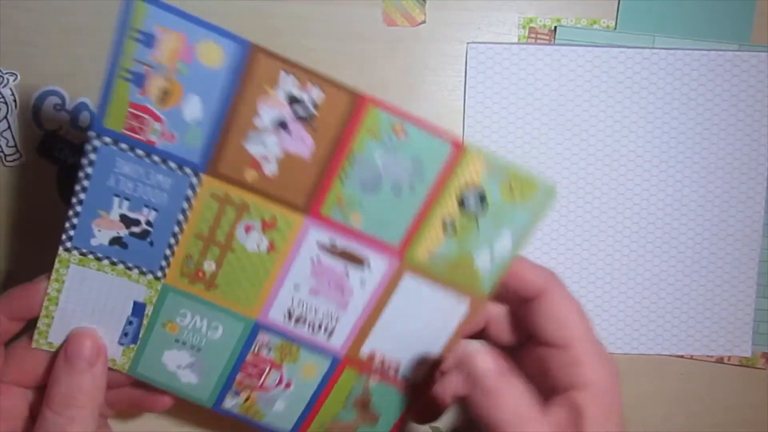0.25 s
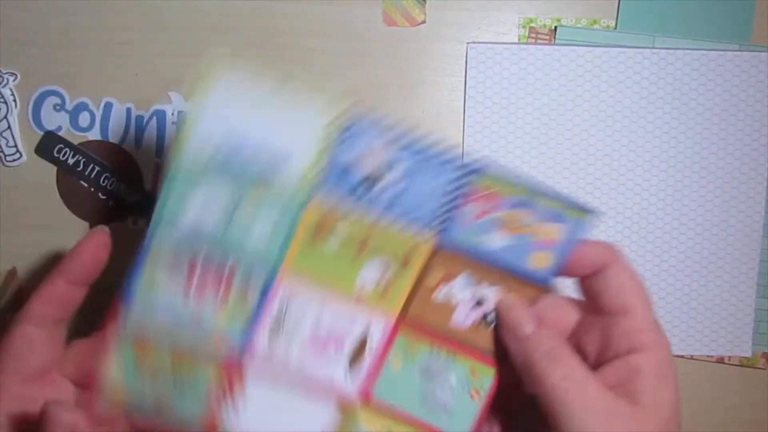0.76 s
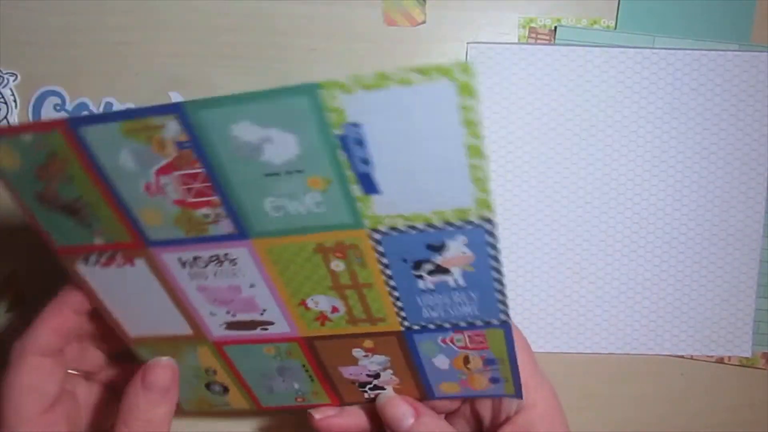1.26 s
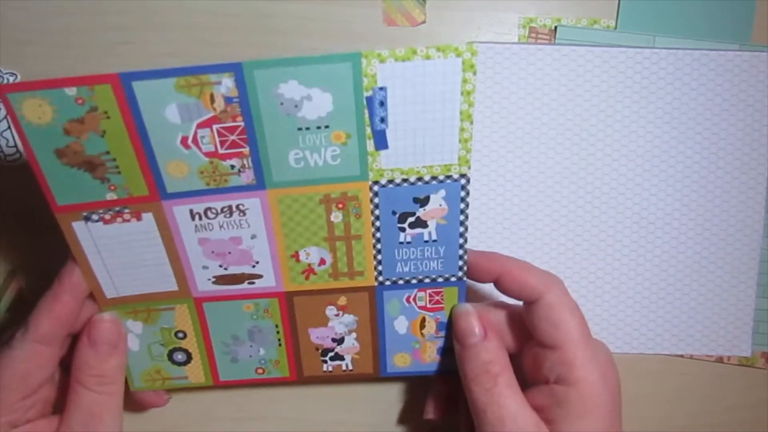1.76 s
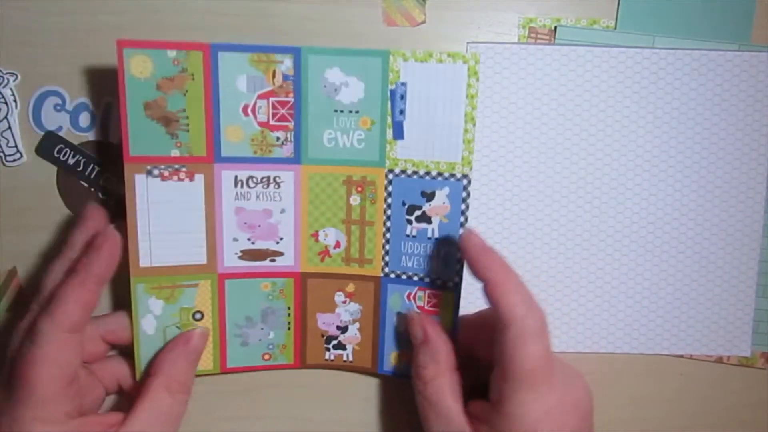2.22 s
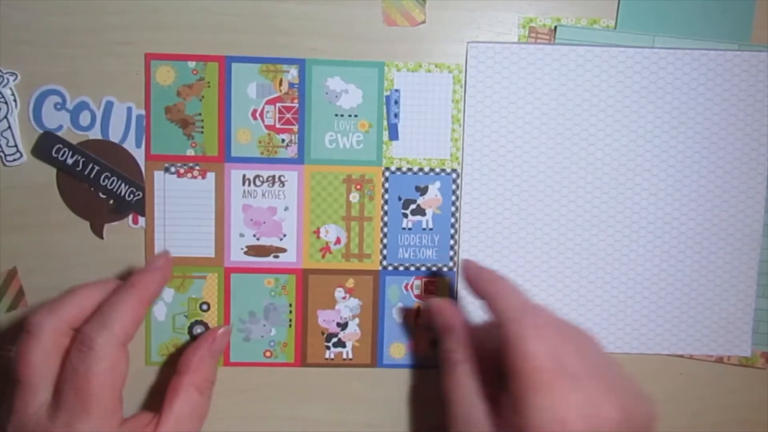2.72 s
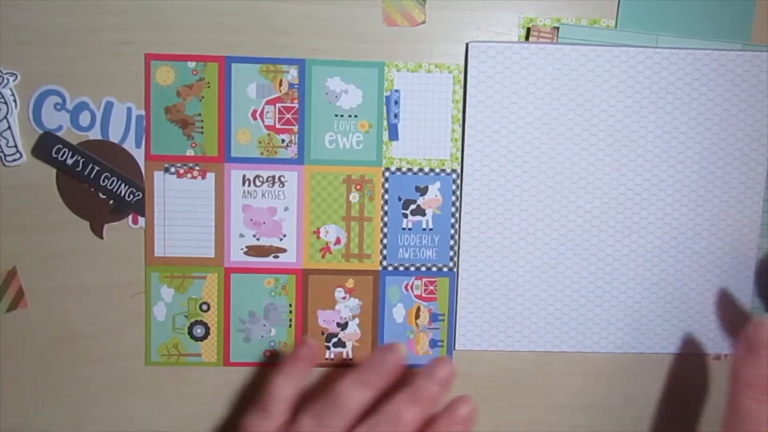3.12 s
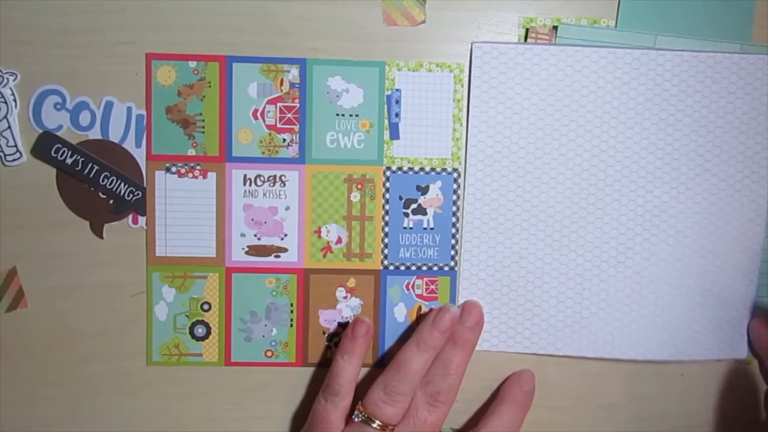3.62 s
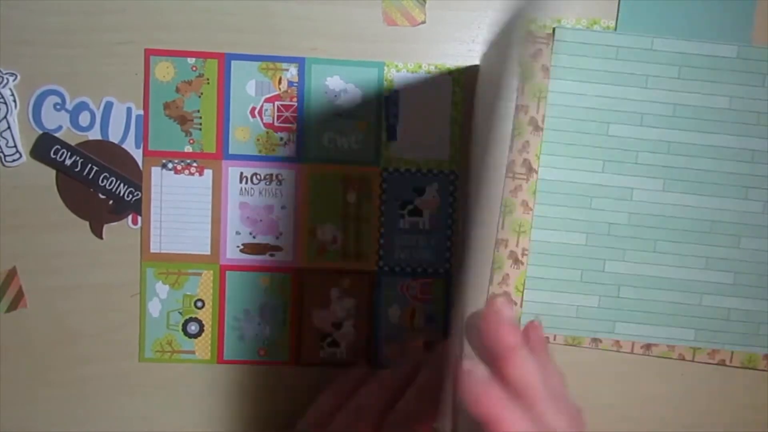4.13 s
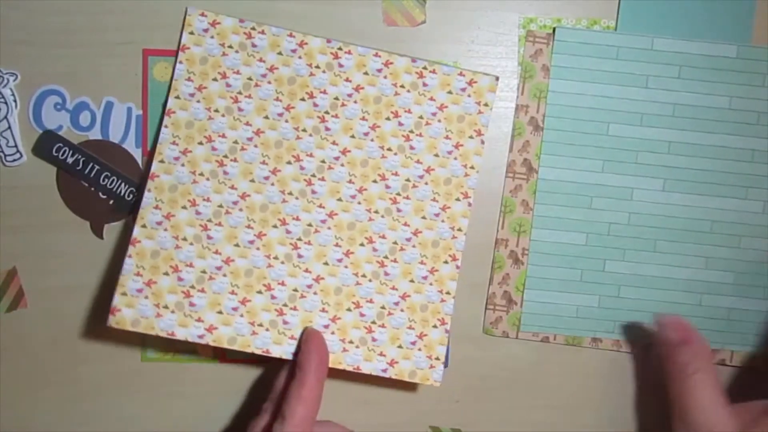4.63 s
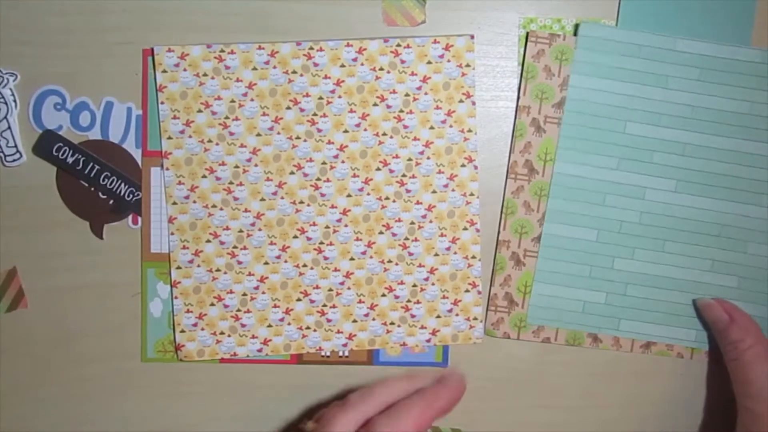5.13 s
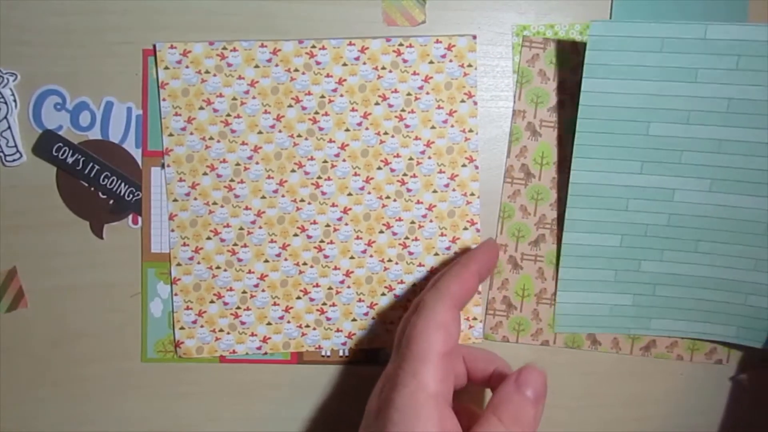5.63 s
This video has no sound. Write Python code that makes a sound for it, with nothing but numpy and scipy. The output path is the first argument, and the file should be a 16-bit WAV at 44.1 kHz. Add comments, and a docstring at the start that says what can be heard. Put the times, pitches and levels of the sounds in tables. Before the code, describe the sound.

Stiff paper is handled on a desk in a quiet room, heard in stereo from just above, with faint ventilation rumble and electrical hum throughout. Fingers rub softly at first. From about 0.7 to 1.4 seconds a sheet is turned, giving hollow buckling pops, crisp clicks and a low flutter of air. Light sliding follows. From 2.2 seconds a swish rises in pitch as the sheet sinks onto the desk, ending in a scuff and sharp snap at 2.6. Fingers brush over the paper. Between 3.7 and 4.2 seconds a second sheet is lifted and flipped with a cluster of snaps and hollow pops, loudest at about 3.8, along with a soft waft of air. It settles with quiet rubbing, and from 5 seconds to about 5.8 there are small scuffs, ticks and gentle flexing sounds as it is nudged into place.

```python
"""A desk in a quiet room, heard through the two microphone ports of a camera above it. Stiff paper sheets
are turned, laid down and lifted. Fibres catch under sliding fingers and edges, the waved sheet pushes air,
folds buckle with hollow pops, edges scuff and corners snap. Once, the rubbing rises in pitch as the air
gap closes under a sinking sheet. Air handling rumbles and the mains hum behind it all."""
import sys
import numpy as np
from scipy import signal
from scipy.fft import rfft, irfft, next_fast_len
from scipy.io import wavfile
from scipy.ndimage import uniform_filter1d, map_coordinates

SR = 44100
rng = np.random.default_rng(int(sys.argv[2]) if len(sys.argv) > 2 else 0)


def file_out(sig):
    """Save sig as 16-bit WAV at sys.argv[1]."""
    # one column per channel
    cols = np.atleast_2d(sig).T
    # limit, then scale
    lim = np.clip(cols, -1, 1)
    pcm = np.round(lim * 32767).astype(np.int16)
    wavfile.write(sys.argv[1], SR, pcm)


N = 258859

# resonance of the air gap under the sinking sheet: time_s, pitch_hz, level_db
AIR_GAP = [(2.16, 1500, -59), (2.24, 1930, -46.5), (2.42, 2380, -48), (2.52, 3360, -48.5),
           (2.59, 5470, -44), (2.63, 6000, -83)]


def amp(db):
    """Gain of a level in dB."""
    return 10 ** (np.asarray(db) / 20)


def unit(x):
    """x at rms 1."""
    return x / np.sqrt(np.mean(x ** 2) + 1e-20)


def along(points, hz):
    """Values at hz, interpolated between points on a log frequency axis."""
    point_hz, values = np.transpose(points)
    return np.interp(np.log(hz + 1), np.log(point_hz + 1), values)


def curves(rows):
    """One value per sample for each column after the time."""
    time_s, *columns = np.transpose(rows)
    return [np.interp(np.arange(N) / SR, time_s, column) for column in columns]


def wobble(rate):
    """A smooth random curve, rate knots a second."""
    return map_coordinates(rng.standard_normal(int(N * rate / SR) + 4), [np.arange(N) * rate / SR])


def filtered(x, response):
    """x through a complex frequency response."""
    size = next_fast_len(x.shape[-1] + 4096)
    return irfft(rfft(x, size) * response(np.fft.rfftfreq(size, 1 / SR)), size)[..., :x.shape[-1]]


def noise(spectrum, grit_db=0, patchy_db=0):
    """Coloured noise of rms 1; grit makes single fibres stand out, patches shift its tone."""
    bins = signal.stft(rng.standard_normal(N) * amp(grit_db * wobble(700)), nperseg=256)[2]
    patches = uniform_filter1d(uniform_filter1d(rng.standard_normal(bins.shape), 3, axis=0), 22, axis=1)
    patchy = signal.istft(bins * amp(patchy_db * unit(patches)), nperseg=256)[1][:N]
    return unit(filtered(patchy, lambda hz: amp(along(spectrum, hz))))


def mode(hz, centre_hz, q):
    """A causal resonance of peak gain 1."""
    damping = 1j * hz * centre_hz / q
    return damping / (centre_hz ** 2 - hz ** 2 + damping)


def room_tone():
    """Air handling rumble and a wavering mains hum, stronger on the left."""
    # rumble spectra, mid and side: frequency_hz, gain_db
    mid_spectrum = [(20, -26), (55, 3), (90, -4), (160, -7), (300, -10), (600, -25.5), (1400, -20.5),
                    (3400, -40), (6500, -31.5), (14000, -42.5)]
    side_spectrum = [(20, -37), (55, -2.5), (120, -2.5), (300, -5), (600, -17), (1400, -21), (2500, -51.5),
                     (5000, -69), (10000, -32), (15000, -45)]
    mid, side = amp(-52.5) * noise(mid_spectrum), amp(-48.5) * noise(side_spectrum)
    phase = 2 * np.pi * 120 * np.arange(N) / SR + .5 * wobble(4.9)
    hum = amp(-49.5 + 3.5 * wobble(10)) * np.sin(phase)
    return np.array([mid + side, mid - side]) * amp([[.7], [-.7]]) + hum * amp([[2.5], [-2.5]])


def pressure():
    """Gains of sheet body, hiss and fibres: each stroke rises, holds and dies as the pressure goes."""
    # strokes: full_pressure_s, rise_s (per 20 dB), hold_s, hiss_db, body_over_hiss_db, fibre_over_hiss_db
    strokes = [(0, .05, 0.079, -58, -11, 0), (0.311, 0.16, 0.06, -53.5, -17, 1.5),
               (0.402, 0.14, 0.25, -60.5, -0.5, 2.5), (0.67, 0.3, 0.091, -57.5, -1, -3),
               (0.866, 0.3, 0.054, -50.5, 3, -2.5), (1.031, 0.03, 0.13, -54, 3, -0.5),
               (1.356, 0.05, 0.19, -50.5, -2.5, -1), (1.663, 0.52, 0.042, -57.5, 1, -7.5),
               (1.794, 0.16, 0.046, -60, 0.5, -7), (1.947, 0.1, 0.037, -58, -0.5, -4),
               (2.158, 0.2, 0.03, -51.5, -3.5, 1.5), (2.216, 0.2, 0.17, -53.5, -5, -3.5),
               (2.578, 0.38, 0.015, -45.5, -21, -7), (2.874, 0.15, 0.35, -56.5, 7, -0.5),
               (3.295, .15, .11, -52, 2, -3.5), (3.461, 1.1, 0.12, -58.5, -6.5, 1),
               (3.692, -0.15, 0.078, -60.5, 12.5, -3), (3.897, 0.04, .17, -54.5, 3, -2),
               (4.118, 1, 0.06, -59, 0.5, 2.5), (4.224, 0.04, 0.17, -55, 1, -0.5),
               (4.574, 0.5, 0.08, -62, 3.5, -1.5), (4.766, 0.2, 0.2, -57.5, 2.5, 0.5),
               (5.017, 0.06, 0.19, -60, 2, 2.5), (5.181, -0.08, 0.24, -53.5, 1.5, -0.5),
               (5.51, 0.3, 0.044, -53.5, -18, 0), (5.601, 0.15, 0.065, -50.5, 2.5, -1.5),
               (5.746, 0.13, 0.092, -51, -2, 0)]
    # floor between strokes: body_db, hiss_db, fibre_db
    rest_db = (-71, -86, -83)
    lift_db_per_s = 417
    t = np.arange(0, N / SR, .001)
    power = amp(rest_db)[:, None] ** 2
    for full_s, rise_s, hold_s, hiss_db, body_db, fibre_db in strokes:
        rise_db = 20 * np.maximum(full_s - t, 0) / max(rise_s, .005)
        lift_db = lift_db_per_s * np.maximum(t - full_s - hold_s, 0)
        power = power + amp(hiss_db - rise_db - lift_db + np.c_[[body_db, 0, fibre_db]]) ** 2
    return [np.interp(np.arange(N) / SR, t, np.sqrt(layer)) for layer in power]


def slide():
    """Fibres catch under fingers and edges; the desk under a hovering sheet returns a close echo."""
    # spectra of sheet body, surface hiss and finest fibres: frequency_hz, gain_db
    body_spectrum = [(300, -4), (550, -8.5), (1200, -1), (2100, -3), (2800, -5.5), (3600, -11),
                     (8000, -24.5)]
    hiss_spectrum = [(1200, -39), (2500, -19), (4000, -2.5), (6000, 3), (8000, -0.5), (11000, -31)]
    fibre_spectrum = [(4000, 2), (7000, -11), (9000, 3.5), (13000, 0.5), (15500, -8)]
    creases_per_s, echo_s = 60, .00125
    body, hiss, fibre = pressure()
    catch = amp(1.8 * wobble(50))
    rub = body * noise(body_spectrum, grit_db=0.5, patchy_db=2.04)
    rub += hiss * catch * noise(hiss_spectrum, grit_db=2.2, patchy_db=3)
    creases = (rng.random(N) < creases_per_s / SR) * rng.standard_normal(N) * hiss * amp(18)
    rub += filtered(creases, lambda hz: mode(hz, 6000, q=1.2))
    rub += closing_gap()
    _, gap_db = curves(AIR_GAP)
    echo_gain = .3 * np.clip((gap_db + 75) / 15, 0, 1)
    rub -= echo_gain * np.roll(rub, round(echo_s * SR))
    return rub + fibre * catch * noise(fibre_spectrum, grit_db=1.5, patchy_db=2.4)


def waved_air():
    """The waving sheet moves air in a low, uneven flutter."""
    # strength of the moving air: time_s, level_db
    swell = [(0.0, -58), (.55, -49.5), (1.0, -49.5), (1.55, -51.5), (1.8, -60.5), (3.68, -57.5),
             (3.85, -47.5), (4.54, -63.5), (4.95, -50), (5.5, -66)]
    # its spectrum: frequency_hz, gain_db
    spectrum = [(70, -10.5), (140, 5), (215, -7.5), (320, -10.5), (550, -11.5), (1000, -42.5)]
    return amp(curves(swell)[0] + 2.2 * wobble(24)) * noise(spectrum)


def thump(t, centre_hz=360, t60_s=0.09):
    """The whole sheet flexes once, low and short."""
    push = rng.standard_normal(len(t)) * amp(-60 * t / t60_s)
    flex = filtered(push, lambda hz: mode(hz, centre_hz, q=0.8) ** 2)
    return flex / np.abs(flex).max()


def buckles():
    """A fold runs through the sheet in uneven jerks, each ringing the curved panel."""
    # the sheet gives way: start_s, level_db, pitch_hz, t60_s, thump_over_level_db
    folds = [(0.211, -43.5, 1210, 0.088, -12), (.421, -35, 1350, 0.053, -20.5),
             (0.713, -19.5, 995, 0.06, -8.5), (0.723, -21, 835, 0.047, -10), (0.734, -21, 930, 0.059, -13),
             (0.9305, -20, 990, 0.044, -10.5), (.948, -31.5, 870, 0.12, 1), (1.013, -29, 1060, 0.088, -6),
             (1.357, -27.5, 935, 0.06, -9.5), (2.6, -32.5, 1170, 0.054, -2), (3.799, -7, 1310, 0.056, -16),
             (3.81, -15, 1320, 0.049, -29), (3.819, -11.5, 1360, 0.079, -13), (3.895, -30, 850, 0.12, -8),
             (4.176, -36.5, 990, 0.069, 6.5), (4.188, -22, 1260, 0.045, 0), (4.803, -59, 1130, .1, 25),
             (5.195, -43.5, 2140, 0.18, -3), (5.375, -38.5, 2000, 0.048, -22),
             (5.518, -39.5, 1530, 0.065, -11), (5.6, -32.5, 1950, 0.072, -10),
             (5.742, -38.5, 1510, 0.31, -17), (5.798, -39, 1440, 0.089, -14)]
    out, t = np.zeros(N + SR), np.arange(SR // 4) / SR
    for start_s, level_db, pitch_hz, t60_s, thump_db in folds:
        q = 1.7 * amp(-.18 * level_db)  # gentler folds ring more sharply

        def panel(hz):
            modes = mode(hz, pitch_hz, q) ** 2 + 0.36 * mode(hz, 1.33 * pitch_hz, q=1.4) ** 2
            return modes / (1 + 1j * hz / (2 * pitch_hz)) ** 3  # rolls off from an octave up

        jerks = rng.standard_normal(len(t))
        jerks *= amp(2.15 * np.repeat(rng.standard_normal(len(t)), 60)[:len(t)])
        jerks *= amp(-60 * t / t60_s) * (1 - np.exp(-t / .002))
        jerks[20] += 2.5  # the first give is the strongest
        ring = filtered(jerks, panel)
        ring /= 3.0 * np.sqrt(np.mean(ring[:round(t60_s * SR / 4) + 40] ** 2))
        out[round(start_s * SR):][:len(t)] += amp(level_db) * (ring + amp(thump_db) * thump(t))
    return out[:N]


def scuffs():
    """An edge drags harder and harder, then slips free."""
    # edge drags: slip_s, level_db, rise_s, t60_s
    drags = [(0.363, -40.5, 0.0067, 0.03), (0.426, -38, 0.0062, 0.035), (0.909, -34, 0.0034, 0.035),
             (2.582, -34, 0.001, 0.13), (2.605, -25.5, 0.0054, 0.041), (3.572, -42.5, 0.012, 0.029),
             (3.859, -36.5, 0.0025, 0.17), (3.974, -31, 0.0085, 0.042), (5.165, -41, 0.0079, 0.069),
             (5.581, -39.5, 0.00092, 0.22)]
    # their spectrum: frequency_hz, gain_db
    spectrum = [(700, -34), (1300, -7.5), (6000, -0.5), (10000, -2.5), (15500, -13.0)]
    t, envelope = np.arange(N) / SR, np.zeros(N)
    for slip_s, level_db, rise_s, t60_s in drags:
        drag = np.exp(np.minimum(t - slip_s, 0) / rise_s)
        release = amp(-60 * np.maximum(t - slip_s, 0) / t60_s)
        envelope += amp(level_db) * drag * release
    return envelope * noise(spectrum, grit_db=2.5, patchy_db=0.5)


def snaps():
    """A corner lets go: a sharp click, a short spray of crackle and a soft thump."""
    # corner releases: start_s, level_db, t60_s, dullness_db
    corners = [(0.4532, -34.5, 0.025, -0.5), (.492, -37, 0.028, -2.5), (0.637, -31, 0.035, -2),
               (0.647, -40, 0.027, -8), (0.737, -27.5, 0.034, -12), (1.0098, -20.5, 0.034, 0),
               (1.132, -33, 0.066, 0), (1.357, -30, 0.035, 0.5), (2.6067, -13.5, 0.048, -11),
               (3.694, -21.5, 0.025, 8.5), (3.786, -13.5, 0.068, -8.5), (3.807, -13, 0.068, -3),
               (3.8892, -19.5, 0.04, -7), (3.9, -27, 0.026, -3), (4.029, -15.5, 0.039, -5),
               (5.01, -35, 0.02, -8), (5.167, -30, .02, -10), (5.385, -39, 0.022, 4)]
    out, t = np.zeros(N + SR), np.arange(SR // 5) / SR
    for start_s, level_db, t60_s, dullness_db in corners:
        spray = 0.29 * amp(-60 * t / t60_s) * rng.standard_normal((2, len(t)))
        spray[:, 0] = 3  # the click
        bright = filtered(spray[0], lambda hz: mode(hz, 6150, q=1.0))
        dull = 3 * filtered(spray[1], lambda hz: mode(hz, 2160, q=0.77) ** 2)
        snap = bright + amp(dullness_db) * dull + amp(-12.5) * thump(t)
        out[round(start_s * SR):][:len(t)] += amp(level_db) * snap
    return out[:N]


def puffs():
    """The waved sheet gives soft, low pushes of air."""
    # air pushes: start_s, peak_db
    pushes = [(.804, -37), (.848, -38.5)]
    out, t = np.zeros(N + SR), np.arange(SR // 5) / SR
    for start_s, peak_db in pushes:
        out[round(start_s * SR):][:len(t)] += amp(peak_db) * thump(t, centre_hz=152, t60_s=0.059)
    return out[:N]


def closing_gap():
    """Rubbing heard through a resonance that rises as the gap under the sheet narrows."""
    time_s, pitch_hz, level_db = np.transpose(AIR_GAP)
    hz, t, bins = signal.stft(rng.standard_normal(N), SR, nperseg=256)
    bins *= np.abs(mode(hz[:, None], np.interp(t, time_s, pitch_hz), q=1.0)) ** 2
    bins /= np.sqrt(np.mean(np.abs(bins) ** 2, axis=0))  # equal power at every pitch
    envelope = amp(np.interp(np.arange(N) / SR, time_s, level_db, left=-120, right=-120))
    return envelope * unit(signal.istft(bins, SR, nperseg=256)[1][:N])


def room_tail():
    """The room's impulse response at energy 1, the treble dying first."""
    # reverberation time: frequency_hz, t60_s
    decay = [(200, 0.44), (12000, 0.23)]
    hz, t, bins = signal.stft(rng.standard_normal(SR // 3), SR, nperseg=256)
    tail = signal.istft(bins * amp(-60 * t / along(decay, hz)[:, None]), SR, nperseg=256)[1]
    return tail / np.linalg.norm(tail)


def microphone_ports(mid):
    """Paper sits near the centre, its bass leaning left; the ports differ most in bass and top treble."""
    # stereo width: frequency_hz, side_over_mid_db
    width = [(100, -1), (400, -13), (1000, -7), (2300, -36), (5500, -17), (8000, -4), (15000, 1)]
    # position of the paper: time_s, left_minus_right_db
    balance = [(3.68, -2), (3.8, -3), (4.0, 0)]
    hz, _, bins = signal.stft(mid, SR, nperseg=256)
    scatter = np.exp(2j * np.pi * rng.random(bins.shape))  # paths round the housing arrive unalike
    side = signal.istft(bins * scatter * amp(along(width, hz))[:, None], SR, nperseg=256)[1][:N]
    side += filtered(mid, lambda hz: 0.24 / (1 + (hz / 900) ** 4))
    pan_db = curves(balance)[0] / 2
    return np.array([mid * amp(pan_db) + side, mid * amp(-pan_db) - side])


def scene():
    """Paper on the desk with a little reverberation, in stereo over the room tone."""
    paper = slide() + waved_air() + buckles() + scuffs() + snaps() + puffs()
    reverb = amp(-12) * signal.fftconvolve(paper, room_tail())[:N]
    return microphone_ports(paper + reverb) + room_tone()


def record(dry):
    """The camera housing cuts a narrow notch; nothing passes above the band limit."""
    notch_hz, top_hz = 695, 15200
    return filtered(dry, lambda hz: (1 - .86 * mode(hz, notch_hz, q=4.5)) * (hz < top_hz))


dry = scene()
out = record(dry)
file_out(out)
```